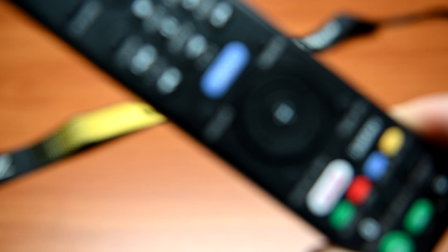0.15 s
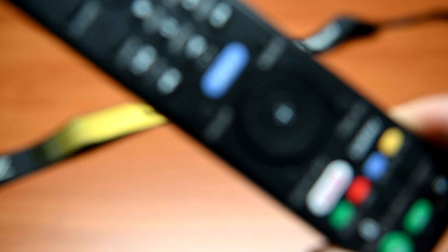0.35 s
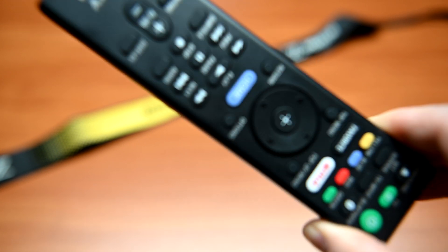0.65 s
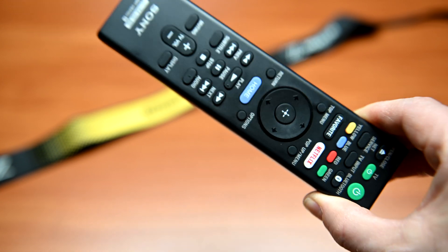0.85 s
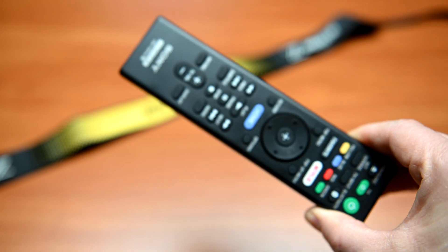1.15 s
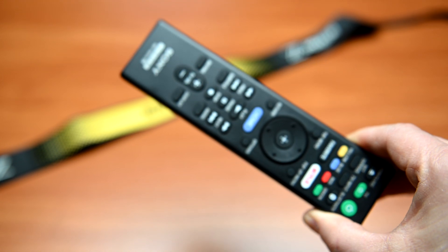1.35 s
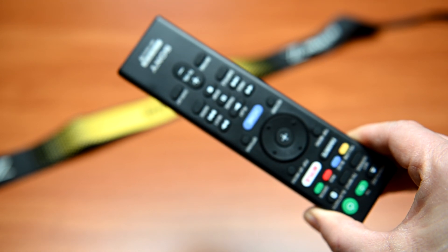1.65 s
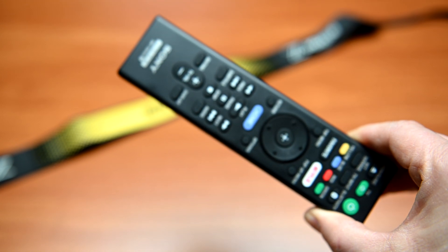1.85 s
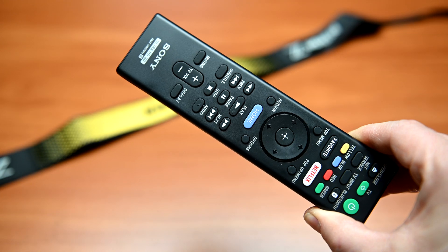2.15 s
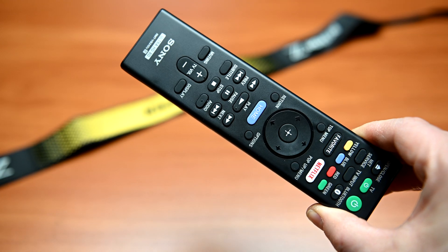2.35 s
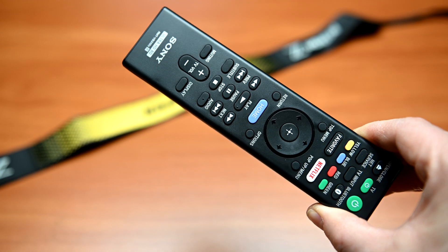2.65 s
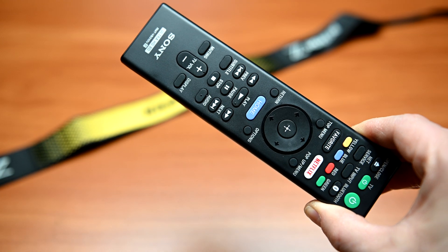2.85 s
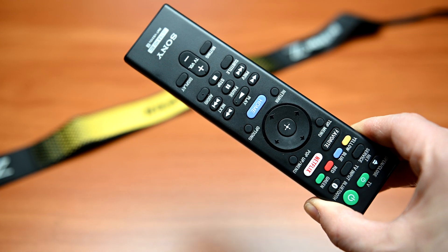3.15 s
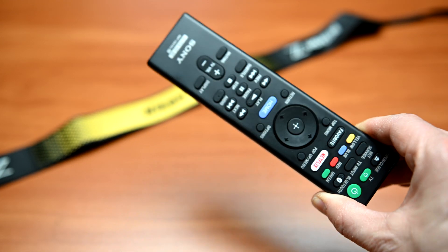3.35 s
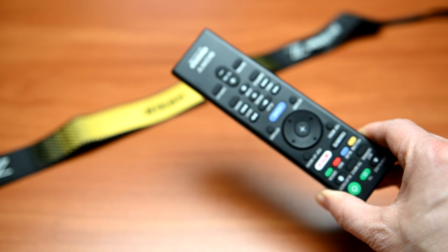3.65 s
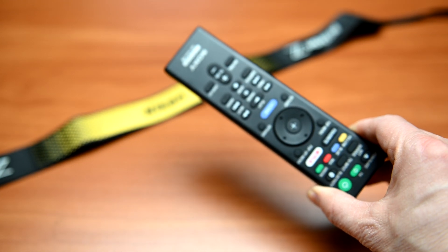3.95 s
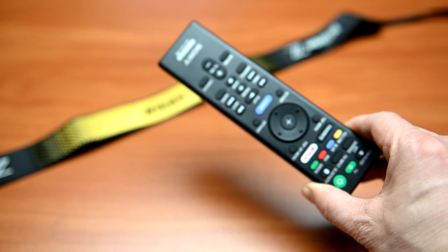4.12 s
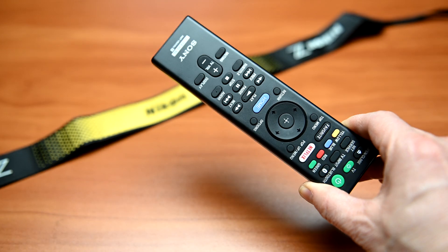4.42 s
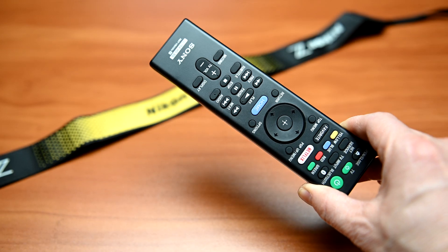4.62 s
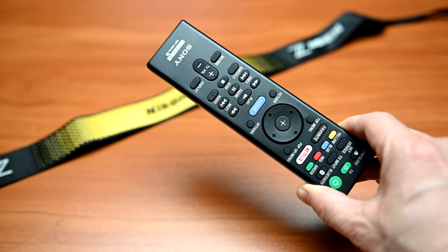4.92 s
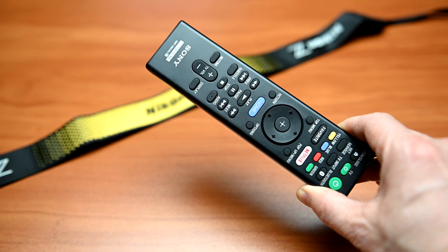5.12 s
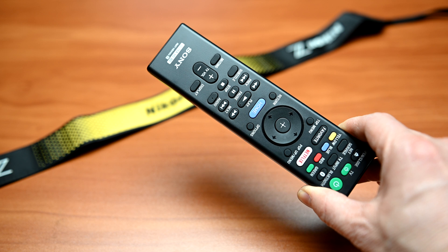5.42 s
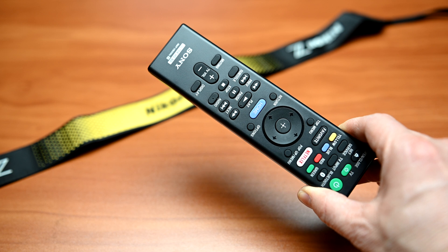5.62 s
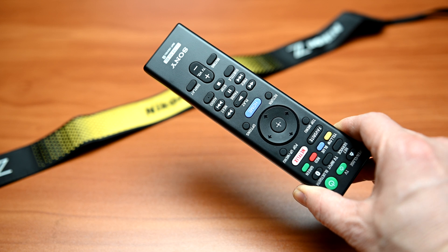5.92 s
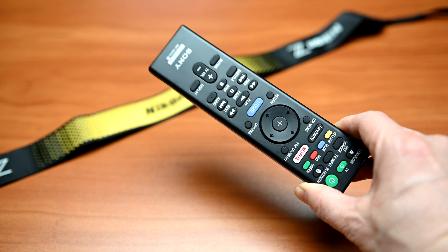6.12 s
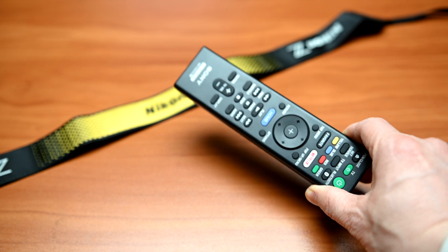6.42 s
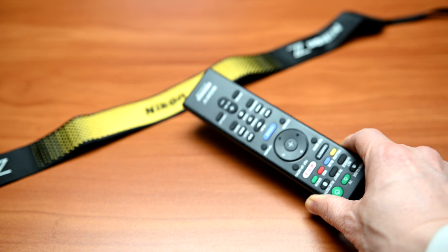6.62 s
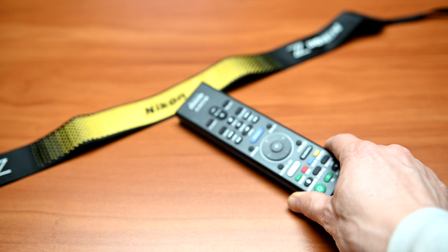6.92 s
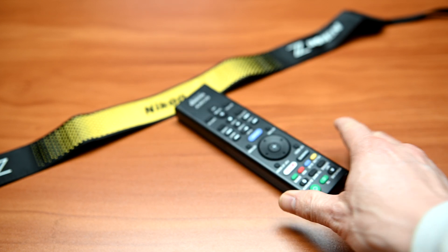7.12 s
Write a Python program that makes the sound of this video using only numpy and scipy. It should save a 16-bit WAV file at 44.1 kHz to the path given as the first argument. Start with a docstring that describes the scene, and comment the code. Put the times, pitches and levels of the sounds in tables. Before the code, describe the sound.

A faint electrical hum and soft hiss run throughout in a quiet room, with a slight hand rustle at the start. At about 2 seconds, right at the microphone, a camera lens motor whirs briefly, followed by a few small, quick focusing clicks. Another burst of clicks comes around 3.4 seconds, with a soft rustle and faint ticks of a shifting grip. At 4.5 seconds the lens whirs again, then chatters in an uneven run of clicks until about 5.4 seconds. A last short burst and a rustle come near 6.4 seconds. At about 7 seconds, an arm's length away, a plastic remote control hits a wooden desk with a sharp clack, the loudest sound. It thumps and knocks again as it settles, its buttons rattling, and rubs briefly as the fingers release it, leaving the hum.

```python
"""A quiet room with mains hum, still air and hiss; a hand rustles softly at once, mid-scene and near the end.
From two seconds on, right at the camera's own two microphones, the lens hunts for focus: a long whirring
move, bursts of short motor steps clacking at start and stop, a second long move, then more steps.
At arm's length, faint ticks come as the grip shifts; near seven seconds a plastic remote control cracks
down on a wooden desk, thumps it, rattles its buttons and rubs as the fingers let go."""
import sys
import numpy as np
from scipy import signal
from scipy.fft import rfft, irfft, next_fast_len
from scipy.io import wavfile

SR = 44100
rng = np.random.default_rng(int(sys.argv[2]) if len(sys.argv) > 2 else 0)


def wav_out(sig):
    """Save sig, one row per channel (or a flat mono array), as 16-bit PCM at SR to the path in sys.argv[1]."""
    wavfile.write(sys.argv[1], SR, np.round(np.clip(np.atleast_2d(sig).T, -1, 1) * 32767).astype(np.int16))


N = 320607
TIME = np.arange(N) / SR  # seconds

# Mains hum in the room. Each row: pitch in Hz, level in dB rms.
HUM = [(120, -73.5), (240, -61), (360, -64), (420, -90), (600, -80), (840, -82), (900, -81), (1560, -88.5),
       (2040, -88)]
# Colour of room air and microphone hiss. Each row: frequency in Hz, relative level in dB.
AIR = [(25, -4.5), (60, 3), (90, 3), (120, 6), (170, 0), (300, 0), (700, -4), (1400, -7), (3000, -12),
       (7000, -15.5), (15500, -18.5)]
# Width of all diffuse noise at the microphones. Each row: frequency in Hz, side minus mid in dB.
NOISE_SIDE = [(30, -10), (120, -2.5), (300, -6), (640, -1.5), (1400, -1.5), (3000, 0.5)]
# How the room dies away. Each row: frequency in Hz, t60 in seconds.
ROOM_DECAY = [(150, 0.73), (1000, 0.23), (3000, 0.21), (10000, 0.14)]

# Rustle with each hand movement. Each row: peak in seconds, peak level in dB,
# rise and fall in seconds (Gaussian widths).
GESTURES = [(.08, -60, .3, .24), (3.48, -59, 0.23, .35), (6.33, -54, 0.074, .48)]
# Colour of that rustle. Each row: frequency in Hz, relative level in dB.
RUSTLE_COLOUR = [(80, -36), (200, -13), (290, 1.5), (400, -13), (600, -21), (1500, -26), (3000, -32.5),
                 (12000, -48)]
# Faint ticks of the shifting grip. Each row: start in seconds, level in dB, pitch in Hz,
# half-width in octaves, t60 in seconds.
HANDLING = [(3.671, -44, 732, 0.16, 0.047), (3.67, -49, 1400, 0.57, 0.013), (3.825, -63, 5000, .15, .06),
            (6.877, -54, 3700, 0.96, 0.073)]

# The remote touches the desk. Each row: start in seconds, crack in dB before softening,
# desk thump in dB, hardness in Hz.
TOUCHES = [(6.9658, 7, -31, 16000), (7.121, -32, -47, 16000), (7.134, -29.5, -24.5, 900),
           (7.1696, -5, -54, 1920), (7.179, -16, -25.5, 1600)]
# Colour of the plastic shell's crack. Each row: frequency in Hz, relative level in dB.
SHELL = [(70, -36), (130, 6), (320, -3), (430, -4.5), (800, 3.5), (1100, 5.5), (1350, -10.5), (2500, -0.5),
         (3400, -5.5), (4200, -9), (5170, -10), (7250, -13), (8060, -24), (15500, -19.5)]
# Shell resonances. Each row: pitch in Hz, width in Hz, boost in dB.
SHELL_MODES = [(710, 29, 6.1), (860, 40, 5.5), (1640, 25, 5.6), (1920, 96, 5.5), (2580, 140, 3.4),
               (3100, 190, 2.1), (3280, 100, 2.3), (5000, 140, 3)]
# Colour of the loose buttons' rattle. Each row: frequency in Hz, relative level in dB.
BUTTONS = [(700, -30), (1600, 5), (2400, -3.5), (3300, -1.5), (4200, -24), (6200, -14), (8000, -21),
           (15000, -24)]
BUTTONS_DB = -8  # rattle against the crack
# Resonances of the desk top. Each row: pitch in Hz, level in dB against the thump, t60 in seconds.
DESK = [(122.8, -15, 0.52), (299, -1, 0.17), (338, 1, 0.15), (577, -19, 0.183), (750, -17, 0.09),
        (866, -29, 0.12), (1600, -27, .2)]
# The remote rubs on the desk and slips from the fingers. Each row: peak in seconds, level in dB,
# t60 in seconds.
RUBS = [(7.06, -53, 0.66), (7.136, -39.5, 0.088), (7.172, -39, 0.13), (7.257, -49.5, 0.048)]
RUB_RISE_S = 0.0045  # Gaussian width
# Colour of the rubs. Each row: frequency in Hz, relative level in dB.
RUB_COLOUR = [(300, -12), (700, 1.5), (1000, 0.5), (1600, -3.5), (3000, -17), (9000, -25), (16000, -35)]

# Contacts that set a small metal part ringing. Each row: start in seconds, pitch in Hz, level in dB,
# t60 in seconds.
PINGS = [(2.072, 3264, -38, 0.041), (4.508, 1676, -39, 0.05), (4.628, 3100, -46, 0.028),
         (4.761, 3150, -49, .04)]
# Colour of the running motor. Each row: frequency in Hz, relative level in dB.
MOTOR = [(100, -15), (250, -3), (340, -4.5), (700, -3.5), (950, -6), (1200, -3.5), (1800, -6),
         (2600, -15.5), (4200, -17), (5500, -25), (9000, -28.5), (16000, -28)]
# Motor resonances. Each row: pitch in Hz, width in Hz, boost in dB.
MOTOR_MODES = [(324, 40, 12), (647, 50, 8.3), (1690, 51, 3.1)]
# Broad colour of the lens barrel. Each row: frequency in Hz, relative level in dB.
BARREL = [(90, -23.5), (170, -6), (290, -6.5), (390, 0.5), (720, 1.5), (950, -5.5), (1100, -1.5),
          (1300, -4.5), (1700, -18), (4000, -52)]
# Barrel resonances. Each row: pitch in Hz, width in Hz, boost in dB.
BARREL_MODES = [(405, 60, 7.5), (555, 33, 2.5), (685, 50, 4), (1100, 53, 3.5)]
# Barrel vibration that reaches the two microphones in opposition. Each row: frequency in Hz,
# side minus mid in dB.
BARREL_SIDE = [(200, 0), (400, -2.5), (700, -4), (1300, -7.5), (2400, -1.5), (4400, -5.5), (9000, 0)]
# Colour of the gear train. Each row: frequency in Hz, relative level in dB.
GEARS = [(500, -31.5), (1100, -7.5), (1400, 2), (1850, 1.5), (2300, -3.5), (2750, -7.5), (3200, -5),
         (4100, -8), (5000, -16.5), (8000, -22)]
# Gear resonances, varied at each contact. Each row: mean pitch in Hz, width in Hz, mean boost in dB.
GEAR_MODES = [(1650, 360, 1.7), (3096, 100, 6.3), (4030, 220, 1.3)]
# Colour of the gear teeth's tick. Each row: frequency in Hz, relative level in dB.
TICK = [(2000, -36), (4500, 11.5), (6500, 2.5), (8300, 5), (10500, 2.5), (13000, 5.5), (15500, 5.5)]

# Hunting steps of the focus motor, in bursts of about 30 a second. Each row: start in seconds,
# strength in dB, travel in seconds, softening of the start by slack gears in dB.
STEPS = [(2.3373, -18.5, .008, -1.5), (2.4059, -17.5, 0.00094, 0), (2.4414, -18.5, 0.0042, -0.5),
         (2.5027, -17.5, .0036, 8), (3.3361, -18, .021, -2), (3.3706, -17.5, .001, 0),
         (3.4023, -17, 0.0034, 4), (3.437, -16.5, 0.0066, -0.5), (3.4721, -17.5, .012, -1.5),
         (4.702, -17.5, .0246, -2), (4.7544, -18, 0.0059, 2), (4.7692, -17.5, .0025, 1.5),
         (4.8063, -18, 0.00092, -1.5), (4.8433, -18, .0016, 0), (4.8702, -17.5, 0.0011, -0.5),
         (4.9383, -18.5, 0.0047, -1), (4.9708, -15.5, .0038, 3.5), (5.005, -17, 0.0011, 0),
         (5.0727, -17, .001, -0.5), (5.171, -16, 0.00099, -1.5), (5.2047, -14, 0.00099, 2.5),
         (5.2375, -17, 0.0056, 7), (5.2719, -19, .001, 0.5), (5.373, -17.5, 0.0033, 4.5),
         (6.3408, -16, 0.011, 1), (6.3746, -16.5, 0.0087, 0), (6.405, -16, .0098, 0.5),
         (6.4479, -15.5, 0.0012, 2)]
SPIN_UP_S = 0.00085  # time constant of the lens gathering speed, so the shortest steps stop softly
ROCK_S, ROCK_TRAVEL_S = .006, 0.006  # delay of the rock back; travel constant over which it gains strength
STEP_WHIRR_DB, COAST_S = -55, .014  # whirr during a step, and its run-on after the stop

# Long focus moves. Each row: start, braking and arrival in seconds, strength in dB.
MOVES = [(2.0715, 2.137, 2.2022, -17), (4.503, 4.549, 4.628, -17.5)]
BACKLASH_S = .005  # the gears take up their slack this long after a move starts
CYCLE_S, CORRECTION_DB_PER_S = .0333, 110  # speed is corrected each control cycle, ever more gently
MOVE_WHIRR_DB, FULL_SPEED_S, SLOWDOWN_DB_PER_S = -47.5, 0.04, 170  # the whirr holds, then fades

# How each kind of contact adds to its strength, one row each: barrel knock, gear clack and tooth tick in dB.
KICK = (-0.87, -1.75, -7)  # the motor starts
STOP = (1, -1.8, -12.5)  # a step ends
ENGAGE = (-8, 1.5, -6)  # the slack is taken up
ROCK = (-10.5, -6.5, -24)  # the gears rock back after a stop
CORRECT = (-9, -9, -17)  # the speed is corrected
BRAKE = (-6.5, -7, -22)  # the motor eases off
ARRIVE = (0, -5, -17)  # the lens comes to rest
ECHO_S, ECHO_DB, ECHO_HZ = 0.00697, -5.5, 705  # delay, gain and low-pass of the desk's echo

TOP_HZ = 15950  # the camera's band limit


def amp(db):
    """Decibels to gain."""
    return 10 ** (np.asarray(db) / 20)


def unit(x):
    """Scaled to rms 1."""
    return x / np.sqrt(np.mean(x ** 2) + 1e-20)


def along(points, hz):
    """(Hz, value) points read on a log frequency axis."""
    f, v = np.transpose(points)
    return np.interp(np.log(hz + 1), np.log(f + 1), v)


def filtered(x, response):
    """x times a response of frequency."""
    n = x.shape[-1]
    m = next_fast_len(n + 2048, True)
    return irfft(rfft(x, m) * response(np.fft.rfftfreq(m, 1 / SR)), m)[..., :n]


def add(track, s, sound):
    """Mix a sound into a track at a time in seconds."""
    part = track[..., round(s * SR):][..., :sound.shape[-1]]
    part += sound[..., :part.shape[-1]]


def body(colour, modes=(), size=8192):
    """Causal impulse response of energy 1: a broad colour with resonances on it."""
    hz = np.fft.rfftfreq(size, 1 / SR)
    boost = 1 + sum((amp(db) ** 2 - 1) / (1 + (2 * (hz - f) / width) ** 2) for f, width, db in modes)
    # folding the cepstrum forward puts the energy as early as possible
    cepstrum = irfft(np.log(amp(along(colour, hz)) * np.sqrt(np.abs(boost))))
    cepstrum[1:size // 2] *= 2
    cepstrum[size // 2 + 1:] = 0
    response = irfft(np.exp(rfft(cepstrum)))
    return response / np.linalg.norm(response)


def ring(x, response):
    """Drive a body or room with continuous forces."""
    return signal.oaconvolve(x, np.atleast_2d(response), axes=1)[:, :N]


def strike(force, response, db):
    """One ring of a body, with the given energy in dB."""
    sound = signal.fftconvolve(force, response[None], axes=1)
    return amp(db) * sound / np.linalg.norm(sound, axis=1, keepdims=True)


def stereo(pair, side_points):
    """Left and right microphones from a mid and a side signal."""
    side = filtered(pair[1], lambda hz: amp(along(side_points, hz)))
    return np.array([pair[0] + side, pair[0] - side])


def noise(colour):
    """Diffuse stereo noise of rms 1."""
    size = next_fast_len(N, True)
    hz = np.fft.rfftfreq(size, 1 / SR)
    white = rng.standard_normal((2, len(hz))) + 1j * rng.standard_normal((2, len(hz)))
    white[1] *= amp(along(NOISE_SIDE, hz))
    mid, side = irfft(white * amp(along(colour, hz)), size)[:, :N]
    return unit(np.array([mid + side, mid - side]))


def room(x, delay, side_db):
    """The walls answer after a short gap with a noise tail whose treble dies first."""
    hz, t, z = signal.stft(rng.standard_normal((2, SR // 2)), SR, nperseg=256)
    decay = amp(-60 * t / along(ROOM_DECAY, hz)[:, None])
    tail = signal.istft(z * decay, SR, nperseg=256)[1]
    mid, side = tail / np.linalg.norm(tail[0])
    tail = np.array([mid + amp(side_db) * side, mid - amp(side_db) * side])
    tail = np.pad(tail, ((0, 0), (round(delay * SR), 0)))
    return ring(x.mean(axis=0)[None], tail)


def mains_hum():
    """Steady sine partials of the mains, equal at both microphones."""
    return sum(amp(db) * np.sqrt(2) * np.cos(2 * np.pi * hz * TIME) for hz, db in HUM)


def rustle():
    """Soft low noise swells and sinks with each movement of the hand."""
    swells = np.zeros(N)
    for peak, db, rise, fall in GESTURES:
        width = np.where(TIME < peak, rise, fall)
        swells += amp(db) * np.exp(-.5 * ((TIME - peak) / width) ** 2)
    return swells * noise(RUSTLE_COLOUR)


def background():
    """Mains hum, still air with microphone hiss, and the rustle of the moving hand."""
    return mains_hum() + amp(-60.5) * noise(AIR) + rustle()


def handling():
    """Small damped bands of noise tick as the grip shifts."""
    out, t = np.zeros(N), np.arange(SR // 8) / SR
    for s, db, pitch_hz, width, t60 in HANDLING:
        def band(hz):
            return 1 / (1 + (np.log2((hz + 1) / pitch_hz) / width) ** 2)
        tick = unit(filtered(rng.standard_normal(len(t)), band))
        add(out, s, tick * amp(db - 60 * t / t60) * (1 - np.exp(-t / 0.00033)))
    return out


def rubs():
    """Friction noise: each rub of the remote starts quickly and dies away."""
    level = np.zeros(N)
    for s, db, t60 in RUBS:
        rise = np.exp(-.5 * (np.minimum(TIME - s, 0) / RUB_RISE_S) ** 2)
        level += amp(db - 60 * np.maximum(TIME - s, 0) / t60) * rise
    return level * noise(RUB_COLOUR)


def remote():
    """Each touch cracks the hollow shell, shakes the buttons and thumps the desk; soft touches are dull."""
    plastic, desk, t = np.zeros((2, N)), np.zeros(N), np.arange(SR // 2) / SR
    shell, buttons = body(SHELL, SHELL_MODES), body(BUTTONS, size=512)
    for s, crack_db, thump_db, hard_hz in TOUCHES:
        def soften(hz):
            return 1 / (1 + 1j * hz / hard_hz)
        chatter_level = 0.2 * amp(-60 * t / 0.022) + 0.026 * amp(-60 * t / 0.046)
        chatter = chatter_level * rng.standard_normal((2, len(t)))
        blow = filtered(chatter, lambda hz: (1j * hz / (1j * hz + 1300)) ** 2)  # high-pass
        blow[0, 0] += 1.15  # the edge lands squarely, then chatters
        rattle_level = amp(-60 * t / 0.097) * (1 - np.exp(-t / 0.0041))
        rattle = rattle_level * rng.standard_normal((2, len(t)))
        add(plastic, s, filtered(strike(blow, shell, crack_db), soften))
        add(plastic, s, filtered(strike(rattle, buttons, crack_db + BUTTONS_DB), soften))
        modes = sum(amp(db - 60 * t / t60) * np.sin(2 * np.pi * hz * t) for hz, db, t60 in DESK)
        push = 1 - np.exp(-t * hard_hz / 12)  # a soft push builds up slowly
        add(desk, s, amp(thump_db) * modes * push)
    return stereo(plastic, [(200, -10), (1300, -10), (5000, -2.5)]) + desk + rubs()


def pings():
    """Brief metallic rings inside the lens: decaying sines."""
    out, t = np.zeros(N), np.arange(SR // 16) / SR
    for s, hz, db, t60 in PINGS:
        add(out, s, amp(db - 60 * t / t60) * np.sin(2 * np.pi * hz * t))
    return out


def whirr(length, tooth_hz, slowing, grit):
    """Gear teeth mesh with uneven force at a falling rate, plus rubbing; a force pair with faded ends."""
    u = np.linspace(0, 1, max(round(length * SR), 256))
    turns = np.cumsum(tooth_hz * (1 - slowing * u)) / SR + rng.random()
    # one pulse each time the count passes a whole tooth
    teeth = unit(np.diff(np.floor(turns), prepend=0) * rng.lognormal(0, .3, (2, len(u))))
    rub = grit * rng.standard_normal(teeth.shape)
    return unit(teeth + rub) * signal.windows.tukey(len(u), .2)


def motor():
    """The motor whirrs as the lens travels: faintly in a step, loudly and then fading in a long move."""
    force = np.zeros((2, N))
    runs = [(s, travel + COAST_S, STEP_WHIRR_DB) for s, _, travel, _ in STEPS]
    runs += [(start, arrival - start, MOVE_WHIRR_DB) for start, _, arrival, _ in MOVES]
    for s, length, db in runs:
        mesh = whirr(length, tooth_hz=366, slowing=0.17, grit=3.2)
        slowing_s = np.maximum(np.arange(mesh.shape[1]) / SR - FULL_SPEED_S, 0)
        add(force, s, mesh * amp(db - SLOWDOWN_DB_PER_S * slowing_s))
    return ring(force, body(MOTOR, MOTOR_MODES))


def contacts():
    """(s, strength dB, kind): steps kick, stop, rock back; moves kick, engage, correct, brake, arrive."""
    rows = []
    for s, db, travel, slack_db in STEPS:
        reached = 1 - np.exp(-travel / np.array([SPIN_UP_S, ROCK_TRAVEL_S]))
        speed_db, swing_db = 20 * np.log10(reached)
        stop = s + travel
        rows += [(s, db - slack_db, KICK), (stop, db + speed_db, STOP), (stop + ROCK_S, db + swing_db, ROCK)]
    for start, braking, arrival, db in MOVES:
        rows += [(start, db, KICK), (start + BACKLASH_S, db, ENGAGE)]
        rows += [(braking, db, BRAKE), (arrival, db, ARRIVE)]
        for t in np.arange(CYCLE_S, arrival - start, CYCLE_S):
            rows.append((start + t, db - CORRECTION_DB_PER_S * t, CORRECT))
    return rows


def contact(lead, rise, settle, chatter):
    """Force of one clack: teeth scrape up to a sharp stop, then chatter to rest."""
    t = np.arange(SR // 50) / SR - lead
    envelope = np.where(t < 0, np.exp(-.5 * (t / rise) ** 2), np.exp(-np.abs(t) / settle))
    scrape = rng.standard_normal((2, len(t))) * envelope
    force = chatter * scrape / np.linalg.norm(scrape, axis=1, keepdims=True)
    force[:, round(lead * SR)] += [1, rng.choice([-1, 1])]
    return force / np.linalg.norm(force, axis=1, keepdims=True)


def rolled(modes, drift, depth_db):
    """Each contact meets a new spot, so its resonances shift in pitch and strength."""
    return [(hz * (1 + drift * rng.normal()), width, db + depth_db * rng.normal())
            for hz, width, db in modes]


def lens():
    """Contacts knock the barrel, clack gears and tick teeth; each knock returns as a dull echo from the desk."""
    lead = .003  # seconds of scrape ahead of each stop
    barrel, teeth = body(BARREL, BARREL_MODES, size=2048), body(TICK, size=512)

    def desk_echo(hz):
        return amp(ECHO_DB) / (1 + 1j * hz / ECHO_HZ)

    out = np.zeros((2, N))
    for s, db, (knock_db, clack_db, tick_db) in contacts():
        begin = s - lead
        gears = body(GEARS, rolled(GEAR_MODES, drift=0.012, depth_db=4.5), size=1024)
        knock = strike(contact(lead, rise=0.0011, settle=0.0022, chatter=1.3), barrel, db + knock_db)
        clack = strike(contact(lead, rise=.001, settle=0.0043, chatter=1.85), gears, db + clack_db)
        tick = strike(contact(lead, rise=0.0011, settle=0.0018, chatter=2.1), teeth, db + tick_db)
        add(out, begin, knock)
        add(out, begin + ECHO_S, filtered(knock, desk_echo))
        add(out, begin, clack)
        add(out, begin, tick)
    return stereo(out + motor(), BARREL_SIDE)


def scene():
    """The lens sits on the camera; the desk is an arm's length away; each has its own room answer."""
    near = lens() + pings()
    far = remote() + handling()
    near = near + amp(-17.5) * room(near, delay=.006, side_db=-5.5)
    far = far + amp(-14.0) * room(far, delay=0.0076, side_db=-17.0)
    return near + far + background()


def record(dry):
    """The camera keeps nothing above its band limit."""
    return filtered(dry, lambda hz: hz < TOP_HZ)


dry = scene()
out = record(dry)
wav_out(out)
```